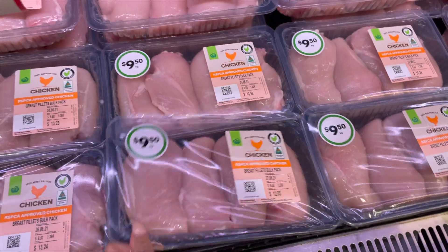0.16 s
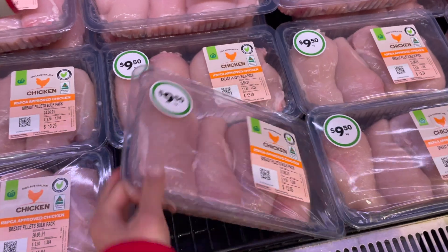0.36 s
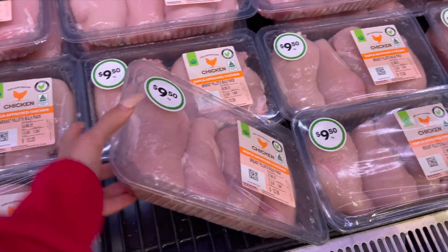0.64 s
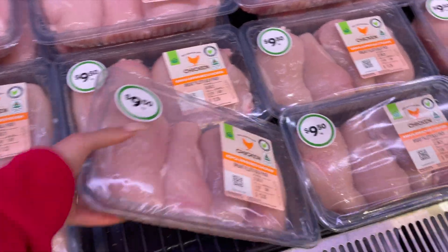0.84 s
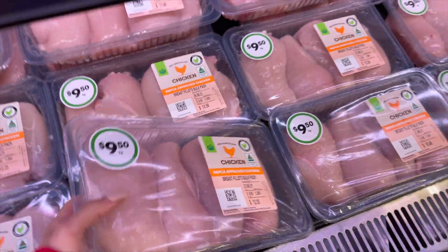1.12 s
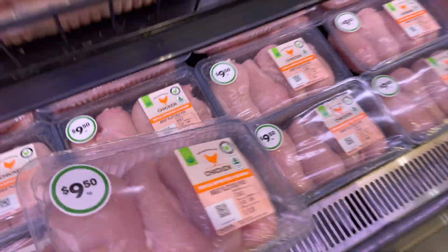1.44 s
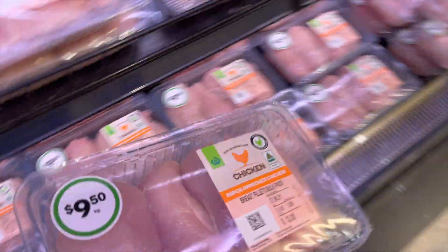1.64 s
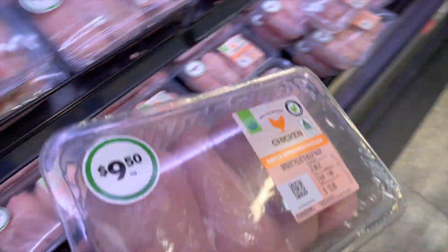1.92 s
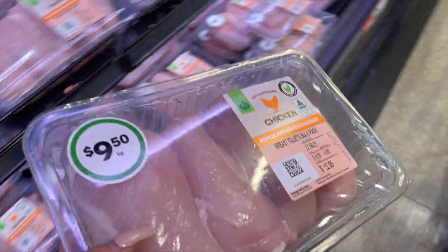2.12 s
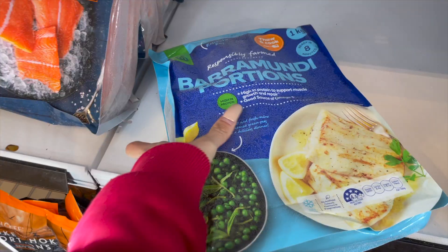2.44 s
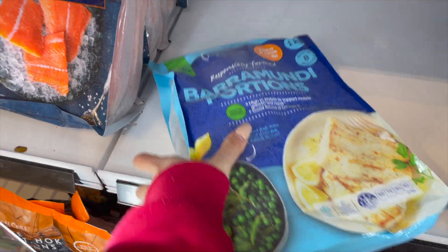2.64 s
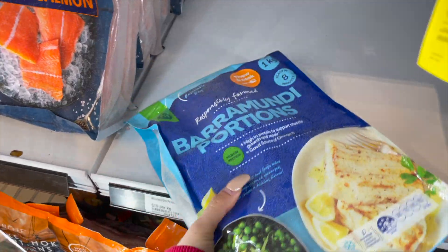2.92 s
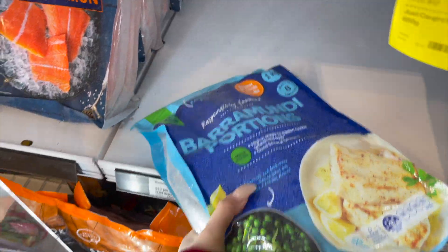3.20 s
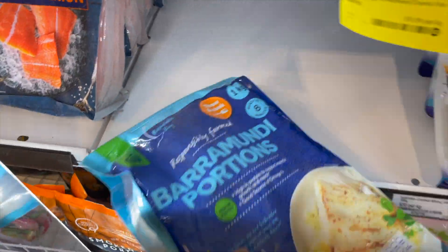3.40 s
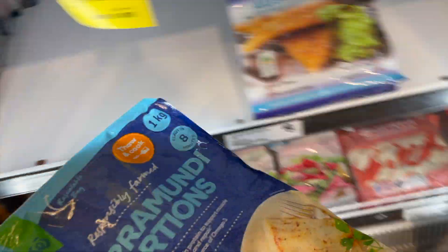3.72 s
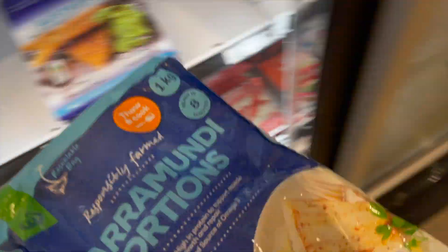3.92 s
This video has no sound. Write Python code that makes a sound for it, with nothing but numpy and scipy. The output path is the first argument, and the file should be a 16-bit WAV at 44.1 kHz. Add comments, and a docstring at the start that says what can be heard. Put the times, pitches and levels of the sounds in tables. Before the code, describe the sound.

Supermarket refrigeration hums and rushes while a hand snaps a plastic-wrapped meat tray, then, after a tiny silent gap, crackles a stiff frozen bag.

```python
"""Two places in a supermarket, joined by a brief silence; fans and compressors hum and rush in both.
Wavering motor tones, shaped noise and faint swelling tones run under a hand that creases plastic.
First, at a chilled case, a film-wrapped tray snaps in short pops with scattered answers, and knocks once.
After the silence, at a freezer, a stiff frozen bag crackles in denser snaps, with a knock of its own."""
import sys
import numpy as np
from scipy import signal
from scipy.fft import rfft, irfft, next_fast_len
from scipy.io import wavfile
from scipy.ndimage import uniform_filter1d, map_coordinates

SR = 44100
rng = np.random.default_rng(int(sys.argv[2]) if len(sys.argv) > 2 else 0)


def put_to_file(sound):
    """Save the sound as 16-bit audio at rate SR, in the file named by the first command-line argument."""
    columns = np.atleast_2d(sound).T  # one column per channel
    safe = np.clip(columns, -1, 1)
    whole_steps = np.round(safe * 32767)
    wavfile.write(sys.argv[1], SR, whole_steps.astype(np.int16))


N = 178781

FIRST_END_S, SECOND_START_S = 2.3585, 2.399  # silence lies between the two places
# Spectrum shared by the air hiss and the swish of the sheet: f/Hz, relative density/dB
HISS_SPECTRUM = [(900, -120), (1500, -17), (2500, 2), (3600, 1.5), (4800, 0.5), (6000, -5.5), (8000, -7.5),
                 (13000, -21), (18000, -7)]
# Interchannel correlation of diffuse sound: f/Hz, left-right correlation
DIFFUSE_CORRELATION = [(60, 1), (250, 0.98), (430, 0.79), (600, 0.22), (800, 0.22), (1500, 0.76),
                       (3000, 0.079), (5200, -0.071), (6500, 0.54), (9000, 1), (12500, 1), (16000, -0.0088)]
# Interchannel correlation of close sound: f/Hz, left-right correlation
CLOSE_CORRELATION = [(500, 0.17), (1000, 0.36), (2000, 0.38), (3500, 0.36), (5200, 0.059), (6500, 0.58),
                     (10000, 1), (12500, 1), (16000, 0.4)]


def amp(db):
    """Level in decibels to amplitude ratio."""
    return 10 ** (np.asarray(db) / 20)


def unit(x):
    """Normalisation to a root-mean-square of 1."""
    return x / np.sqrt(np.mean(x ** 2) + 1e-20)


def along(points, hz):
    """Interpolation of (f/Hz, value) points on a logarithmic frequency axis."""
    f, v = np.transpose(points)
    return np.interp(np.log(hz + 1), np.log(f + 1), v)


def curves(rows):
    """Linear interpolation in time: one signal for each column after t/s."""
    s, *columns = np.transpose(rows)
    return [np.interp(np.arange(N) / SR, s, column) for column in columns]


def wobble(rate):
    """Slow random modulation: a smooth curve through random knots, rate of them a second."""
    knots = rng.standard_normal(int(N * rate / SR) + 4)
    return map_coordinates(knots, [np.arange(N) * rate / SR])


def filtered(x, response):
    """Linear filtering: the spectrum of x times a response of frequency."""
    n = x.shape[-1]
    m = next_fast_len(n + 4096)
    return irfft(rfft(x, m) * response(np.fft.rfftfreq(m, 1 / SR)), m)[..., :n]


def spread(pair, correlation):
    """Interchannel coherence: a rotation weights two signals as mid and side to set left-right correlation."""
    def weights(hz):
        angle = np.arccos(np.clip(along(correlation, hz), -1, 1)) / 2
        return np.array([np.cos(angle), np.sin(angle)])

    mid, side = filtered(pair, weights)
    return np.array([mid + side, mid - side])


def noise(spectrum, patchy_db, size=512):
    """Coloured turbulence: a noise pair of rms 1 with random gain over patches of time and frequency."""
    z = signal.stft(rng.standard_normal((2, N + size)), nperseg=size)[2]
    # a larger size makes the patches narrower in frequency and longer in time
    field = uniform_filter1d(rng.standard_normal(z.shape[1:]), size=4, axis=0)
    field = uniform_filter1d(field, size=8, axis=1)
    pair = signal.istft(z * amp(patchy_db * unit(field)), nperseg=size)[1][:, :N]
    return unit(filtered(pair, lambda hz: amp(along(spectrum, hz))))


def second_place():
    """Step function in time: false at the chilled case, true at the freezer."""
    return np.arange(N) / SR > (FIRST_END_S + SECOND_START_S) / 2


def motors(tones, waver, swing_db, rate, waver_rate=9):
    """Standing waves in a large hall: motor tones wander in phase (waver/rad) and swing in strength."""
    t = np.arange(N) / SR
    total = 0
    for hz, db in tones:
        strength = amp(db) * np.sqrt(2) * unit(amp(swing_db * wobble(rate)))
        total = total + strength * np.sin(2 * np.pi * hz * t + waver * wobble(waver_rate))
    return total


def refrigeration():
    """Periodic and turbulent machine noise: motor tones over deep noise, rumble, rushing air and hiss."""
    # Motor tones at the case, one group a motor: f/Hz, level against its hum/dB
    case_tones = [
        [(241, -2), (252, -3.5)],
        [(225, 0.5)],
        [(199, 1.5)],
        [(156.8, -0.5), (99.6, -7)],
    ]
    # Motor tones at the freezer, one group a motor: f/Hz, level against its hum/dB
    freezer_tones = [
        [(223.5, 1.5), (442, -18.5)],
        [(196.5, 0)],
        [(113, 0)],
        [(97, 0)],
    ]
    # Hum as the microphone moves past the cabinets, one list a place: t/s, four motor levels/dB
    hum_levels = [
        [(0.0, -38, -36, -41, -29), (0.25, -29.5, -33.5, -43, -42), (0.36, -35, -37, -48, -42),
         (0.47, -34, -30, -28.5, -30), (0.76, -25, -34, -43, -32), (0.93, -50, -36, -35.5, -32),
         (1.02, -32, -26.5, -37.5, -34), (1.24, -34, -34, -36, -37), (1.3, -26.5, -50, -54, -31.5),
         (1.56, -36, -39, -34, -41), (1.65, -39, -49, -35, -32), (1.71, -28.5, -50, -64, -31.5),
         (1.86, -34, -31, -36, -37), (1.9, -37.5, -37, -43, -44), (2.19, -29.5, -46, -53, -36),
         (2.34, -36, -57, -35, -41)],
        [(2.42, -29.5, -33, -44, -38), (2.518, -26.5, -25, -44, -35), (2.628, -32.5, -45, -59, -47),
         (2.66, -33.5, -31.5, -44, -37), (2.832, -25, -29, -31, -60), (2.968, -25.5, -30, -33.5, -40),
         (3.09, -39.5, -28, -48, -49), (3.196, -25.5, -32, -52, -37), (3.364, -28, -28.5, -52, -58),
         (3.464, -40.5, -36, -35, -42), (3.522, -27, -30, -62, -49), (3.572, -31.5, -36, -46, -41),
         (3.832, -33.5, -32, -33, -35), (3.872, -39, -63, -49, -62), (3.93, -30, -30, -34, -35),
         (4.05, -30, -45, -53, -57)],
    ]
    # Faint whistling lines near the freezer: f/Hz, level/dB
    whistle_lines = [(4180, -57), (4830, -57)]
    # Air noise, one list a place: t/s, deep level/dB, rumble level/dB, rush level/dB, hiss level/dB
    air_levels = [
        [(0.0, -36, -26.5, -33.5, -47.5), (1.2, -40, -29, -34, -48), (1.8, -42.5, -28.5, -36, -49),
         (2.34, -43, -29, -35, -50)],
        [(2.42, -44.5, -31.5, -35.5, -60), (3.3, -46.5, -28.5, -36.5, -54), (4.05, -40.5, -32.5, -37.5, -43.5)],
    ]
    # Deepest noise: f/Hz, relative density/dB
    deep_spectrum = [(12, -120), (25, -8), (38, -6.5), (52, 3), (75, -6), (95, -23), (150, -120)]
    # Rumble at the case: f/Hz, relative density/dB
    case_rumble_spectrum = [(47, -35), (80, -6.5), (144, -4), (189, -5.5), (241, -2.5), (297, -6.5),
                            (368, -6.5), (500, -13), (650, -26.5), (1100, -120)]
    # Rumble at the freezer: f/Hz, relative density/dB
    freezer_rumble_spectrum = [(47, -33), (80, -4.5), (108, -1.5), (151, -1.5), (210, -0.5), (245, -3),
                               (279, -6.5), (351, -7.5), (500, -23), (650, -87), (1100, -120)]
    # Rushing air: f/Hz, relative density/dB
    rush_spectrum = [(200, -120), (330, -5.5), (450, 0), (650, -3), (1000, -8.5), (1600, -17.5),
                     (2500, -24), (3500, -25.5), (5000, -120)]
    # The fans lie mostly to the left: f/Hz, left-right level difference/dB
    lean_points = [(60, 1.5), (110, 0.5), (200, 2.5), (380, 4.5), (700, 0.5), (1290, 0.5), (2380, 1),
                   (4400, -1.5), (8120, 0), (15000, 1)]
    # Phase difference of the diffuse sound: f/Hz, lag of the left/rad
    lag_points = [(250, .1), (430, .4), (700, 2.3), (1000, 2.5), (1500, 1.5), (1800, 0)]

    late = second_place()
    tones = 0
    for db, case, freezer in zip(curves(np.vstack(hum_levels)), case_tones, freezer_tones):
        at_freezer = motors(freezer, waver=0.086, swing_db=0.46, rate=7.33)
        at_case = motors(case, waver=0.58, swing_db=1.0, rate=8.25)
        tones = tones + amp(db) * np.where(late, at_freezer, at_case)
    tones += late * motors(whistle_lines, waver=2.5, swing_db=4, rate=12, waver_rate=130)

    deep_db, rumble_db, rush_db, hiss_db = curves(np.vstack(air_levels))
    freezer_rumble = noise(freezer_rumble_spectrum, patchy_db=1.25)
    case_rumble = noise(case_rumble_spectrum, patchy_db=1.23)
    air = amp(deep_db) * noise(deep_spectrum, patchy_db=0.0)
    air += amp(rumble_db) * np.where(late, freezer_rumble, case_rumble)
    air += amp(rush_db + 1.2 * wobble(7.16)) * noise(rush_spectrum, patchy_db=2.0, size=1024)
    air += amp(hiss_db) * noise(HISS_SPECTRUM, patchy_db=4.0)

    def skew(hz):
        left_over_right = amp(along(lean_points, hz)) * np.exp(-1j * along(lag_points, hz))
        return left_over_right ** np.array([[.5], [-.5]])

    return filtered(spread(air, DIFFUSE_CORRELATION), skew) + tones * amp([[.8], [-.8]])


def swells():
    """Amplitude modulation by Gaussian envelopes: faint wavering mid tones rise in the distance and sink."""
    # Distant tones: centre t/s, time from centre to the 1/e^2 point/s, f/Hz, level/dB
    swell_events = [(0.03, .08, 470, -35), (0.72, .05, 1150, -48), (1.096, .05, 610, -37),
                    (1.3, .06, 1230, -53), (1.402, .08, 1000, -47), (1.553, 0.094, 735, -40),
                    (1.62, .06, 830, -45), (1.86, 0.04, 640, -42.5), (2.073, .12, 965, -48),
                    (2.107, 0.14, 1280, -53.5), (2.27, 0.076, 1040, -47.5), (2.318, 0.045, 1290, -54)]
    t = np.arange(N) / SR
    pair = np.zeros((2, N))
    for s, length, hz, db in swell_events:
        tone = [motors([(hz, db)], waver=0.87, swing_db=0.0, rate=19, waver_rate=30) for _ in "LR"]
        pair += np.exp(-2 * ((t - s) / length) ** 2) * np.array(tone)
    return spread(pair, DIFFUSE_CORRELATION)


def crinkle(spectrum, per_second, size_db, life_s):
    """Shot noise: many tiny creases of random size, each a burst of noise decaying by 1/e in life_s."""
    when, luck = rng.random((2, 4000))[:, :int(per_second * N / SR)]
    hits = np.bincount((when * N).astype(int), amp(-size_db * np.log(luck + 0.022)), N)
    envelope = signal.lfilter([1], [1, -np.exp(-1 / (life_s * SR))], hits)
    return unit(noise(spectrum, patchy_db=2.5) * envelope)


def crackle(per_second, centre_hz, octaves, cycles, size_db):
    """Random impulsive excitation: small pops of the sheet, each at its own pitch, with clumped strength."""
    when, luck = rng.random((2, 6000))[:, :int(per_second * N / SR)]
    start = (when * N).astype(int)
    hz = centre_hz * 2 ** (octaves * rng.standard_normal(6000)[:len(when)])
    hz = np.clip(hz, 950, 7000)[:, None]
    clump_db = 1.6 * wobble(45)[start]
    size = amp(-size_db * np.log(luck + 0.049) + clump_db)[:, None]
    t = np.arange(300) / SR
    u = t * hz / cycles
    pops = size * u * np.exp(1 - u) * np.sin(2 * np.pi * hz * t)
    at = start[:, None] + np.arange(len(t))
    # alternate pops feed the two unrelated signals
    pair = [np.bincount(at[k::2].ravel(), pops[k::2].ravel(), N + len(t))[:N] for k in (0, 1)]
    return unit(np.array(pair))


def handling():
    """Superposed small bucklings: fingers crease the plastic, rustle its film and swish the sheet."""
    # Handling, one list a place: t/s, creasing level/dB, rustling level before film and swish gains/dB
    handling_levels = [
        [(0.0, -45.5, -73), (0.33, -51, -71), (0.39, -39, -59.5), (0.46, -44, -59), (0.525, -39, -72),
         (0.55, -28.5, -70), (0.61, -48, -53.5), (0.7, -45, -67.5), (0.93, -44, -61.5), (1.15, -57, -72),
         (1.5, -43.5, -73.5), (1.73, -39.5, -64.5), (1.95, -54, -69), (2.34, -54, -77)],
        [(2.42, -32.5, -51.5), (2.47, -42.5, -57), (2.65, -34.5, -53), (2.74, -36.5, -49.5), (2.8, -25, -50),
         (2.87, -37.5, -52), (2.96, -29, -51), (3.036, -37.5, -56.5), (3.125, -32, -52.5), (3.164, -30, -47.5),
         (3.186, -32, -49), (3.25, -29.5, -48.5), (3.32, -28.5, -48.5), (3.375, -36, -52), (3.45, -31.5, -54.5),
         (3.52, -47, -55.5), (3.62, -50.5, -60), (3.68, -40, -54.5), (3.78, -46, -59.5), (4.05, -43.5, -62.5)],
    ]
    # Creasing: f/Hz, relative density/dB
    crease_spectrum = [(500, -120), (800, -6), (1200, 3), (2200, -9), (3500, -6), (5000, -25), (8000, -84),
                       (12000, -120)]
    # Rustling film: f/Hz, relative density/dB
    film_spectrum = [(2000, -120), (3500, -8), (5500, 0), (8000, -1.5), (12500, -4), (15000, -8),
                     (18000, -10)]

    crease_db, rustle_db = curves(np.vstack(handling_levels))
    crease = amp(-7) * crinkle(crease_spectrum, 690, size_db=4.0, life_s=0.004)
    crease += amp(-4.5) * crackle(1400, centre_hz=1970, octaves=0.83, cycles=0.81, size_db=1.5)
    film = amp(12.0) * crinkle(film_spectrum, 900, size_db=4.0, life_s=0.012)
    swish = amp(rustle_db + 12.5) * noise(HISS_SPECTRUM, patchy_db=3.5)
    close = amp(crease_db + wobble(29.98)) * crease  # 1 dB of random flutter
    close += amp(rustle_db + 0.86 * wobble(23.3)) * film
    return spread(close, CLOSE_CORRELATION) + spread(swish, DIFFUSE_CORRELATION)


def blip(t, hz, rise_ms):
    """Damped oscillation: a few cycles swell, sag in pitch and die."""
    roundness = 2.23  # power of the envelope
    sag = 0.1  # pitch glides from this share above hz towards the same share below
    rise = np.clip(rise_ms, .1, 5) / 1000
    u = t / rise
    cycles = hz * (t * (1 - sag) + 2 * sag * rise * (1 - np.exp(-u)))
    return (u * np.exp(1 - u)) ** roundness * np.sin(2 * np.pi * cycles)


def snaps(table, gain_db, pop_ms, scatter_db, tail_s, sharp, bright_db, fizz_db):
    """Snap-through buckling of a sheet: a crack, a low and a high pop, scattered answers and treble fizz."""
    crack_db, crack_t60 = -14, 0.0011  # broad crack that opens each snap (level before differencing, s)
    echo_db, echo_t60 = -20.5, 0.09  # answer of nearby shelves (dB, s)
    answer_s = 0.00076  # build-up time of the answers
    slower = 1.24  # swell of a pop over its listed rise

    out, t = np.zeros((2, N + 8192)), np.arange(3000) / SR
    top = signal.butter(2, 9000, "high", fs=SR)
    u = 1000 * t / np.clip(pop_ms, .1, 4)
    pop = u * np.exp(1 - u)
    tail = amp(scatter_db - 60 * t / tail_s) + amp(echo_db - 60 * t / echo_t60)
    tail *= 1 - np.exp(-(t / answer_s) ** 2)
    for s, low_db, low_hz, rise_ms, high_db, high_hz, treble_db, pan_db in table:
        burst = rng.standard_normal((4, 2, len(t)))
        # sound[0] is the mid signal, sound[1] the side signal
        sound = amp(treble_db + fizz_db) * signal.lfilter(*top, burst[2] * (pop + tail))
        crack = np.diff(uniform_filter1d(burst[3, 0], size=4), prepend=0) * 2
        sound[0] += amp(crack_db - 60 * t / crack_t60) * crack
        pops = ((0, low_hz, rise_ms, burst[0]), (high_db + bright_db, high_hz, pop_ms, burst[1]))
        for db, hz, ms, hiss in pops:
            answers = unit(signal.lfilter(*signal.iirpeak(hz, sharp, fs=SR), hiss)) * tail
            sound += amp(db) * answers
            sound[0] += amp(db) * blip(t, hz, slower * ms)
        level = amp(low_db + gain_db + np.array([[pan_db / 2], [-pan_db / 2]]))
        out[:, round(s * SR):][:, :len(t)] += spread(sound, CLOSE_CORRELATION) * level
    return out[:, :N]


def knocks(blows, modes):
    """Modal ringing: a dull knock of pack on shelf sets off exponentially damped sines."""
    out, t = np.zeros(N + SR), np.arange(SR // 4) / SR
    for s, db in blows:
        for hz, level, t60 in modes:
            ring = amp(db + level - 60 * t / t60) * np.sin(2 * np.pi * hz * t)
            out[round(s * SR):][:len(t)] += ring
    return out[:N]


def tray():
    """Buckling and modal ringing of a film-wrapped plastic tray at the chilled case."""
    # Snaps: t/s, level before gain/dB, low pop f/Hz, its rise before slowing/ms,
    # high pop relative level before bright_db/dB, high pop f/Hz,
    # fizz relative level before fizz_db/dB, left-right level difference/dB
    tray_events = [(0.0878, -29, 2040, 0.24, -10, 6610, -12, -1),
                   (0.1714, -39, 1640, 0.43, 4.5, 7400, -17, -2),
                   (0.2309, -32.5, 2290, 1, -21, 5430, -27.5, -2),
                   (0.348, -32.5, 2100, .3, 3, 3400, -27, -6), (0.3634, -32, 2580, .3, -10, 4200, -23, -5),
                   (0.3948, -12, 2360, 0.54, -1, 2890, -26, 2), (0.4013, -25, 4140, 0.39, 2, 5500, 0, -8),
                   (0.4071, -17.5, 3320, 0.38, -4.5, 6230, -7, -3),
                   (0.4447, -36, 3730, 0.47, 10, 8300, 6.5, 5.5),
                   (0.4798, -31, 1420, 0.33, -4, 4460, 1.5, 2),
                   (0.5034, -18.5, 2900, 0.44, -1.5, 5800, -16, -1),
                   (0.5165, -25.5, 2050, 0.24, -5, 3300, -29, -2),
                   (0.518, -19, 1120, 0.75, -20, 4480, -34, -3),
                   (0.5362, -6.5, 2200, 1.1, -10, 6200, -25, 2),
                   (0.5438, -14, 2300, 0.57, -2, 6250, -13, -3), (0.809, -49.5, 3000, .4, 0, 7000, 6, 3),
                   (0.849, -51, 3000, .4, 0, 7000, 6, 1), (0.8872, -31.5, 2620, 0.44, -9, 6960, -2.5, -4),
                   (0.903, -46, 3000, .4, 2, 7000, 7, 0), (0.9135, -35.5, 2370, 0.4, 7, 6370, 6, 4),
                   (0.9366, -40, 1360, .46, 1, 7260, 10, 4), (0.9606, -32, 2350, .46, 3, 6830, -17, 3),
                   (0.9678, -19, 3350, 0.32, -10, 5550, -8.5, -2.5),
                   (1.0001, -6, 3200, 0.28, -4, 4570, -10, -1.5),
                   (1.0013, -15, 2350, 1.07, 1, 7600, -8, 7.5),
                   (1.0044, -12.5, 1510, 0.53, -7, 7200, -11, -1),
                   (1.0569, -42, 2260, .46, -2, 6440, 7, -5), (1.2612, -42.5, 1890, 0.39, -9, 5380, 3, 1),
                   (1.6702, -30.5, 3250, 0.44, 1.5, 7490, -29, 3.5),
                   (1.76, -44, 3300, 0.37, 8, 7700, -10, 1), (1.88, -32.5, 3270, 0.5, -4, 7620, -14, 0),
                   (1.9767, -28, 6800, 0.5, 9.5, 8470, -21, 1.5),
                   (2.1232, -36, 3080, 0.63, -2, 7600, -26, -1), (2.1794, -39, 3120, 0.52, 0, 7260, -15, 4),
                   (2.188, -44, 2980, .4, 12, 7500, -3, 1), (2.2, -44, 3000, .4, 5, 7300, 2, -1),
                   (2.3018, -32, 2940, .46, -24, 5960, -33, 1)]
    # Hard knocks on the shelf: t/s, level/dB
    tray_blows = [(1.002, -15.5)]
    # Modes of the tray: f/Hz, relative level/dB, t60/s
    tray_resonances = [(857, -3, 0.032), (1087, 2, 0.012), (1560, -1, 0.015)]
    snapping = snaps(tray_events, gain_db=1.5, pop_ms=0.36, scatter_db=-18, tail_s=.028,
                     sharp=1.6, bright_db=-2.0, fizz_db=3.5)
    return snapping + knocks(tray_blows, tray_resonances)


def bag():
    """Buckling and modal ringing of a stiff frozen bag pulled out of the freezer."""
    # Snaps: t/s, level before gain/dB, low pop f/Hz, its rise before slowing/ms,
    # high pop relative level before bright_db/dB, high pop f/Hz,
    # fizz relative level before fizz_db/dB, left-right level difference/dB
    bag_events = [(2.4105, -29, 2170, 0.19, -6, 6800, -16, 3),
                  (2.4242, -12.5, 3520, 0.42, -4, 4400, -25, -5),
                  (2.427, -21, 1330, 0.55, -6, 7400, -16, 3),
                  (2.4567, -10.5, 2260, 0.34, -4.5, 4400, -12, 0),
                  (2.4996, -14.5, 3350, 0.16, -4.5, 5530, -11, -2),
                  (2.5025, -18, 1440, 0.22, 3.5, 3360, -13, -5), (2.521, -25.5, 2300, .3, 0, 5200, -8, 2),
                  (2.5826, -22, 1420, 0.25, -10, 4460, -14, -3),
                  (2.589, -22, 900, 1.3, -12, 4000, -24, -0.5),
                  (2.6035, -25, 1710, 0.48, 4.5, 6000, -3, -2),
                  (2.6226, -25.5, 3140, 0.48, -14, 7750, -19, -1),
                  (2.6716, -17, 2360, 0.2, 2, 8200, -12, 3),
                  (2.6754, -15.5, 4400, 0.24, 10, 6300, -13, -6.5),
                  (2.679, -8.5, 2250, 0.27, 3.5, 7100, -10, -2.5), (2.6823, -17, 1610, 1, 2, 3720, -17, -2),
                  (2.6842, -16.5, 3800, 0.47, -10, 5240, -16, 5), (2.721, -33, 3220, .4, 0, 5500, -12, 0),
                  (2.7385, -34, 2700, .5, 2, 4050, -13, 0), (2.758, -29, 1620, 0.33, 2, 2800, -15, -4),
                  (2.764, -23, 2600, 0.35, -5, 1300, -14, -1), (2.771, -33, 4200, 1, -6, 6330, -12, 1),
                  (2.775, -25, 2300, 0.35, -2, 1100, -16, -2), (2.787, -27.5, 2920, .4, -1, 1200, -15, -2),
                  (2.804, -20, 1070, .6, 3, 3000, -15, -2), (2.781, -31, 1430, 1.4, 6, 2000, -19, -5),
                  (2.7935, -22, 940, 2, 9, 1900, -18, -3), (2.799, -24, 1500, 0.59, 1, 2700, -18, -3),
                  (2.8086, -18, 1900, 0.44, -1, 6660, -17, -3), (2.811, -20, 1120, 0.6, -2, 3500, -19, -3),
                  (2.8232, -23, 2200, .33, 9, 5940, -11, 0), (2.833, -23, 1210, 1, -5, 2500, -20, -3),
                  (2.8394, -19, 1560, 0.37, -5, 5490, -16, -4), (2.842, -22, 950, 0.79, -1, 2040, -16, -3),
                  (2.8996, -18, 2620, 0.4, -7, 5700, -17, 0),
                  (2.9078, -21.5, 1210, 1.3, 7.5, 3260, -20, -2),
                  (2.934, -39, 1100, 0.76, -4, 2800, -20, -2), (2.941, -26, 1560, 0.77, -5, 2900, -18, -5),
                  (2.9525, -22, 1000, 0.5, 9, 2400, -22, -3),
                  (2.968, -25.5, 1280, 1.1, -1, 3000, -18, -1.5),
                  (2.9766, -21, 1210, 0.46, 5.5, 3920, -17, -3),
                  (3.0008, -11, 2460, 0.28, -4.5, 7300, -12, 0.5),
                  (3.003, -18.5, 910, 1.6, 0, 5000, -14, -3.5),
                  (3.0052, -14, 1940, 0.44, -1.5, 4000, -21, -3),
                  (3.0348, -33, 1250, 0.74, -3, 4460, -18, -4), (3.069, -34, 1130, 0.93, -6, 2500, -15, -1),
                  (3.0906, -11.5, 2900, 0.49, -4.5, 1700, -36, -2),
                  (3.1085, -14.5, 2540, 0.38, -21, 5790, -27, -1),
                  (3.1329, -35, 3400, .33, -4, 4630, -1, -1),
                  (3.1423, -18.5, 2000, 0.52, -18, 7210, -19, -1),
                  (3.1609, -21.5, 2170, .6, -17, 7400, -17, 0), (3.162, -22.5, 940, 1.2, -8, 4200, -19, -2),
                  (3.1645, -25.5, 2200, .8, 0, 4200, -17, -1), (3.1974, -26, 2240, 0.66, -10, 5790, -18, 1),
                  (3.199, -29, 1410, 1.2, -4, 4000, -16, -8), (3.2116, -18.5, 2850, 0.27, -3, 4690, -12, 1),
                  (3.2226, -27, 2140, 1.3, -16, 6160, -16, 2), (3.2446, -29, 2320, 2.4, -8, 1460, -11, 2),
                  (3.2731, -24.5, 1460, 2.7, -5, 900, -13, -9), (3.306, -32, 1090, 0.63, 5, 2090, -16, -4),
                  (3.3372, -15.5, 2020, 0.34, -1, 3200, -17.5, -8),
                  (3.344, -20, 3000, 0.54, 5, 4300, -18, 0), (3.3495, -25, 1970, 0.43, 0, 5000, -18, -2),
                  (3.3524, -2.5, 3040, 0.28, -3.5, 4670, -23, 2.5),
                  (3.3556, -11, 3660, 0.68, 1, 4870, -19, -8),
                  (3.3945, -13.5, 1500, 0.38, 1.5, 3300, -19, -2),
                  (3.4113, -23, 1890, 0.46, -5, 1100, -18, 1), (3.4165, -24, 2880, 0.48, -4, 4000, -19, -1),
                  (3.422, -25, 4600, .6, -3, 2500, -15, 0), (3.4081, -13.5, 3100, 0.23, -3, 6630, -10, -2),
                  (3.4342, -25, 1350, 1.1, -10, 7390, -17, -8), (3.4442, -19, 2470, 0.22, -5, 4730, -20, 0),
                  (3.4565, -19, 1340, 0.56, -2, 3300, -24, -1),
                  (3.4741, -37, 2650, 0.36, -10, 5050, -13, 0), (3.525, -32, 2200, .33, -1, 4630, -13, -1)]
    # Hard knocks on the shelf: t/s, level/dB
    bag_blows = [(2.679, -18)]
    # Modes of the bag: f/Hz, relative level/dB, t60/s
    bag_resonances = [(466, 1.5, 0.055), (970, 3.5, 0.037)]
    snapping = snaps(bag_events, gain_db=1.5, pop_ms=0.37, scatter_db=-17, tail_s=.026,
                     sharp=1.76, bright_db=-3.5, fizz_db=2.5)
    return snapping + knocks(bag_blows, bag_resonances)


def scene():
    """Linear superposition of the hall's machines, distant tones, handling, tray and bag."""
    return refrigeration() + swells() + handling() + tray() + bag()


def record(dry):
    """Interchannel phase and band limits: treble phase parts left from right, and silence joins the places."""
    # Treble phase difference: f/Hz, lead of the left/rad
    lead_points = [(5600, 0), (7200, 1.3), (10500, 3.14), (13400, 4.8), (15800, 6.28)]
    bass_hz = 46.5  # microphone roll-off
    top_hz, top_side_hz = 15900, 14600  # upper limits of mid and side
    fade_out_s, fade_in_s = 0.00071, 0.0093

    pair = filtered(dry, lambda hz: np.exp(.5j * along(lead_points, hz) * np.array([[1], [-1]])))
    pair = signal.lfilter(*signal.butter(2, bass_hz, "high", fs=SR), pair)
    t = np.arange(N) / SR
    fade_in = np.clip((t - SECOND_START_S) / fade_in_s, 0, 1)
    fade_out = np.clip((FIRST_END_S - t) / fade_out_s, 0, 1)
    pair = pair * np.where(second_place(), fade_in, fade_out)
    mid = filtered(pair[0] + pair[1], lambda hz: hz < top_hz)
    side = filtered(pair[0] - pair[1], lambda hz: hz < top_side_hz)  # the top of the band is mono
    return np.array([mid + side, mid - side]) / 2


dry = scene()
out = record(dry)
put_to_file(out)
```